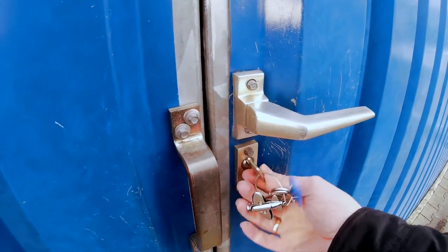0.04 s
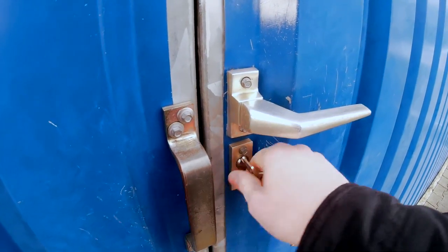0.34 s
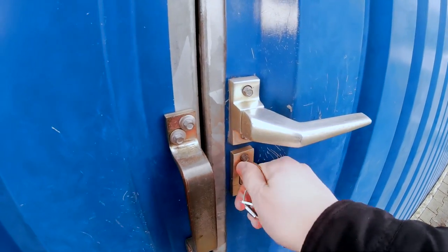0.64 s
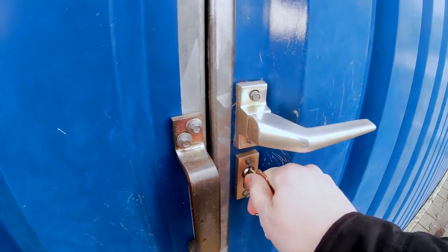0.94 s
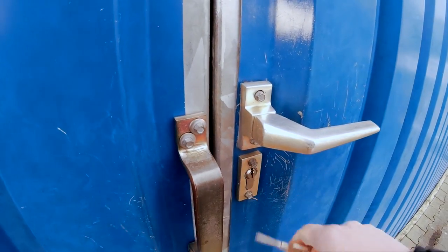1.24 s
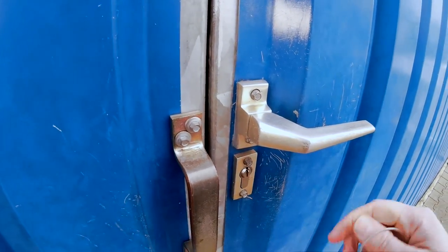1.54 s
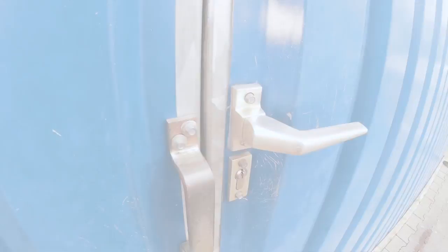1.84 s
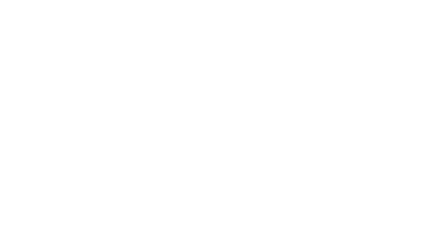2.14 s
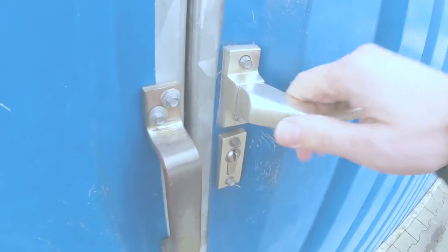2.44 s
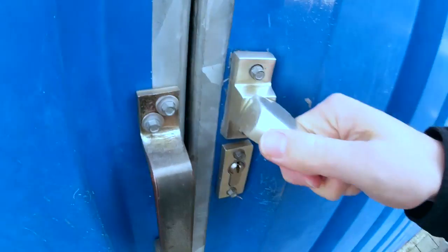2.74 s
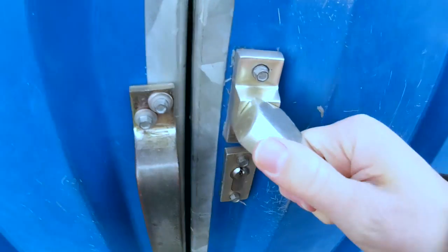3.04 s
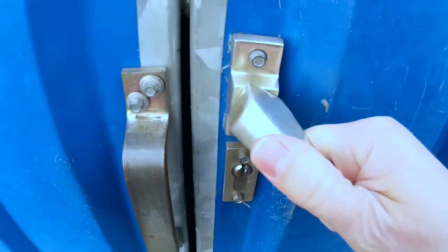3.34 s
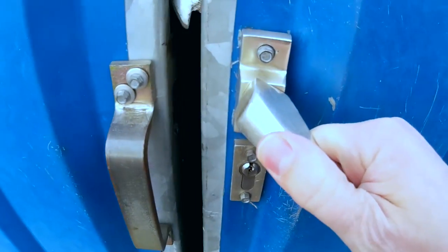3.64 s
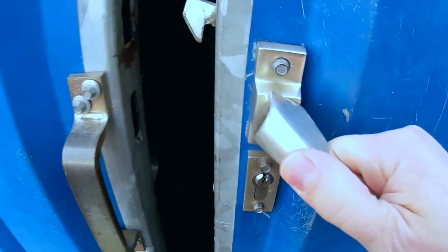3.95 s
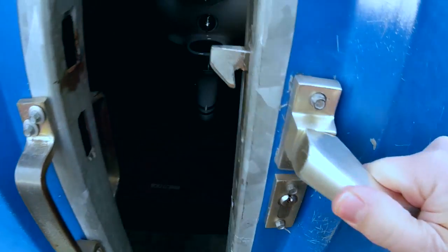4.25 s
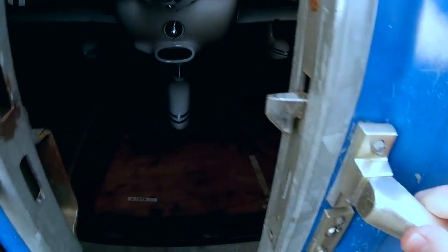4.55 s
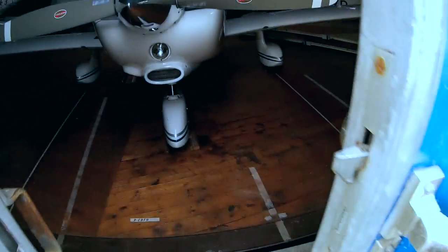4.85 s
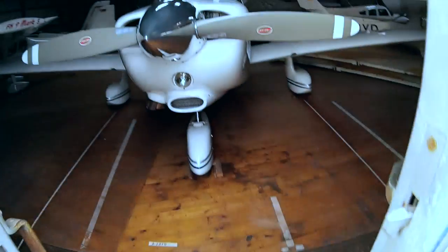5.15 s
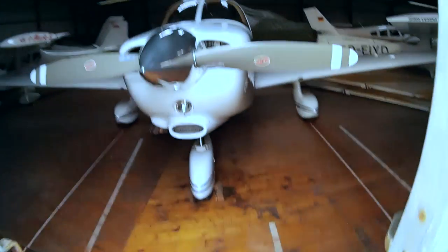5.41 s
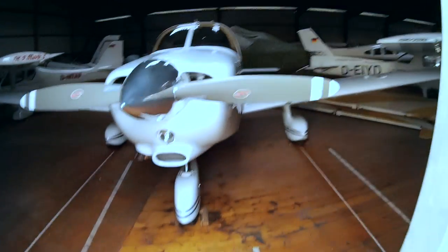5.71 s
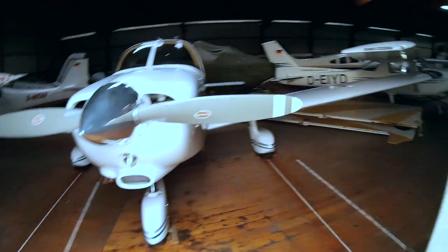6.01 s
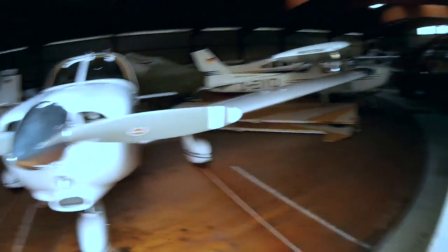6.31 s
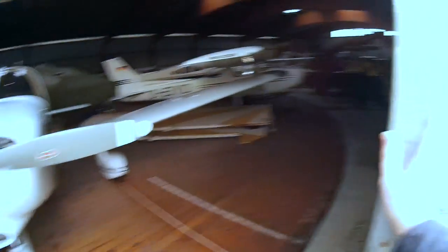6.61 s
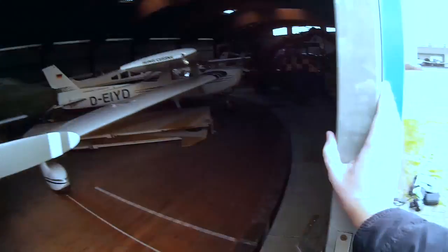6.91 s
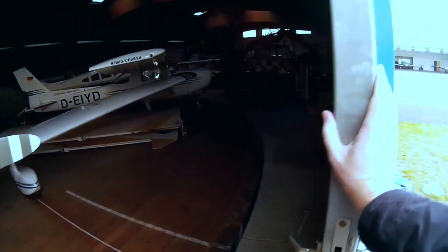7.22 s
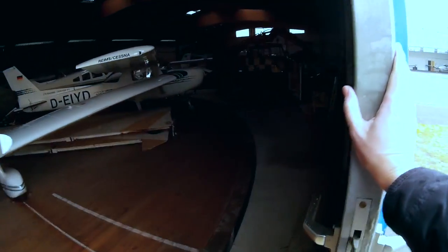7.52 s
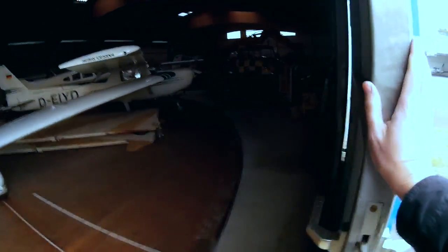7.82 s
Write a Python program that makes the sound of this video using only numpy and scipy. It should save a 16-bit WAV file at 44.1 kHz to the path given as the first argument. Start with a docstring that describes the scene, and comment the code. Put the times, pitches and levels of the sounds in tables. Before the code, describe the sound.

Keys jingle in a lock, a handle clacks, and a steel door squeals, then rumbles open on its rollers.

```python
"""Outdoors at a steel hangar door, in light wind, with a camera's faint pulsing whine. Keys collide and
ring in their modes as a cylinder lock is turned and the key drawn out. The handle goes down with three
clacks, impacts that set the steel leaf ringing. Stick-slip friction makes the door groan and squeal as
it breaks free; then its rollers rumble over the rail and its joints, slow, and are pushed on.
The hall behind the door adds a faint reverberation."""
import sys
import numpy as np
from scipy import signal
from scipy.fft import rfft, irfft, next_fast_len
from scipy.io import wavfile

SR = 44100
rng = np.random.default_rng(int(sys.argv[2]) if len(sys.argv) > 2 else 0)


def wav_record(signal):
    """Record a signal, one row per channel, as 16-bit PCM in the file named by sys.argv[1]."""
    frames = np.transpose(np.atleast_2d(signal))
    bounded = np.clip(frames, -1, 1)
    # unit amplitude maps onto the largest positive 16-bit level
    quanta = np.round(bounded * 32767).astype(np.int16)
    wavfile.write(sys.argv[1], SR, quanta)


N = 351477
TIME = np.arange(N) / SR
SCREECH_S = 3.586   # the squeal breaks into a higher mode

# speed of the door on its rail, as the level of its rollers: t/s, level/dB
ROLL = [(3.75, -52), (4.22, -39), (4.42, -40), (4.53, -23), (4.68, -30), (4.74, -28), (5.82, -31),
        (5.97, -41), (6.04, -36), (6.76, -49), (7.24, -46), (7.76, -26), (7.95, -23)]
# decay of the steel leaf: f/Hz, T60/s
DOOR_T60 = [(100, 0.51), (300, 0.12), (1000, 0.24), (3500, 0.29), (12000, 0.16)]


def from_db(db):
    """Amplitude ratio of a level."""
    return 10 ** (np.asarray(db) / 20)


def rms_one(x):
    """Normalisation to unit power."""
    return x / np.sqrt(np.mean(x ** 2) + 1e-20)


def at_hz(points, hz):
    """Interpolation on a logarithmic frequency axis."""
    frequencies, values = np.transpose(points)
    return np.interp(np.log(hz + 1e-9), np.log(frequencies), values)


def colour(x, spectrum):
    """Spectral shaping, falling 12 dB per octave beyond the ends of the spectrum; rms 1."""
    size = next_fast_len(len(x))
    hz = np.arange(size // 2 + 1) * SR / size + 1e-3
    ends = np.minimum(1, hz / spectrum[0][0]) ** 2 * np.minimum(1, spectrum[-1][0] / hz) ** 2
    return rms_one(irfft(rfft(x, size) * from_db(at_hz(spectrum, hz)) * ends, size)[:len(x)])


def drift(per_s):
    """Random modulation, interpolated between per_s values a second; rms 1."""
    return rms_one(np.interp(TIME * per_s, np.arange(N // 8), rng.standard_normal(N // 8)))


def grains(per_s, spread_db):
    """Shot noise: a Poisson train of tiny impacts of uneven size."""
    sizes = from_db(spread_db * np.minimum(rng.exponential(1, N), 4)) * rng.choice([-1, 1], N)
    return sizes * (rng.random(N) < per_s / SR)


def add(out, s, sound):
    """Superposition of a sound from time s on."""
    start = round(s * SR)
    out[start:start + len(sound)] += sound[:N - start]


def swells(rows):
    """Gaussian rises of amplitude that add in power, as incoherent sources do."""
    return np.sqrt(sum((from_db(db) * np.exp(-.5 * ((TIME - s) / half_s) ** 2)) ** 2
                       for s, half_s, db in rows))


def envelope(start_s, attack_s, hold_s, t60, db):
    """A smooth attack, a hold and an exponential decay."""
    rise = np.sin(np.pi / 2 * np.clip((TIME - start_s) / attack_s, 0, 1)) ** 2
    return rise * from_db(db - 60 * np.clip((TIME - start_s - attack_s - hold_s) / t60, 0, 2))


def glide(start_s, hz, hz_per_s):
    """A linear frequency sweep that stops after a quarter of a second."""
    return hz + hz_per_s * np.clip(TIME - start_s, 0, .25)


def tone(hz, partials, jitter_hz):
    """Sustained oscillation with frequency jitter; partials are harmonic number, level/dB."""
    phase = 2 * np.pi * np.cumsum(hz + jitter_hz * drift(700)) / SR
    return np.sqrt(2) * sum(from_db(db) * np.sin(k * phase) for k, db in partials)


def ring(modes, t):
    """Free vibration: damped sinusoids, weighted and tuned a little differently by each impact."""
    chance = rng.normal(0, (1.5, .001), (len(modes), 2))
    sines = sum(from_db(db + more_db - 60 * t / t60) * np.sin(2 * np.pi * hz * (1 + detune) * t)
                for (hz, db, t60), (more_db, detune) in zip(modes, chance))
    return sines * (1 - np.exp(-t / .0006))


def burst(spectrum, t60s, t, tilt_db=0, t60_factor=1):
    """High modal density: third octaves of noise, each decaying at its own rate; tilt per octave."""
    hz = np.arange(len(t) // 2 + 1) * SR / len(t)
    edges = np.geomspace(45, 16000, 26)
    centres = np.sqrt(edges[1:] * edges[:-1])[:, None]
    gain = from_db(at_hz(spectrum, hz) + tilt_db * np.log2(np.maximum(hz, 150) / 1000))
    noise = rfft(rng.standard_normal(len(t))) * gain
    bands = irfft(noise * ((hz >= edges[:-1, None]) & (hz < edges[1:, None])), len(t))
    envelopes = (1 - np.exp(-2 * centres * t)) * from_db(-60 * t / (at_hz(t60s, centres) * t60_factor))
    return (bands * envelopes).sum(0) / bands.sum(0).std()


def dip_db(s=2.29, half_s=.09, depth_db=6.5):
    """A brief Gaussian dip in the level of the background."""
    return -depth_db * np.exp(-.5 * ((TIME - s) / half_s) ** 2)


def travel():
    """Rolling noise grows with speed: the rollers' level/dB, and a 0-1 ramp as they start."""
    return np.interp(TIME, *np.transpose(ROLL)), np.clip((TIME - ROLL[0][0]) / .066, 0, 1)


def air(breeze_db=-50, wash_db=-51.3, fall_db_per_s=.6):
    """Turbulent pressure fluctuations on the microphone, over a wash of distant outdoor noise."""
    # gusts, and the draught through the opening door: centre t/s, half width/s, level/dB
    gusts = [(0.0, .035, -38), (0.5, .3, -44), (1.2, .1, -38), (2.85, .3, -49), (3.65, .3, -44),
             (4.42, .3, -32), (5.3, .6, -38.5), (7.8, .35, -45)]
    # spectra of the wind and the wash: f/Hz, level/dB
    wind_spectrum = [(20, 3), (40, -7), (58, 2.5), (80, -7.5), (150, -10.5), (300, -25.5), (500, -36.5)]
    wash_spectrum = [(200, 1), (430, -3.5), (650, -3), (1000, -0.5), (1300, -4.5), (1600, -7.5),
                     (2200, -18.5), (4300, -22.5), (8500, -29.5)]
    strength = np.hypot(from_db(breeze_db), swells(gusts)) * from_db(.92 * drift(14))
    wind = strength * colour(rng.standard_normal(N), wind_spectrum)
    wash_level = from_db(wash_db - fall_db_per_s * TIME + 2.1 * drift(15))
    wash = wash_level * colour(rng.standard_normal(N), wash_spectrum)
    return (wind + wash) * from_db(dip_db())


def camera_noise(whine_hz=9514, bend_hz=660, pulse_hz=36.316):
    """Electrical noise: hiss, and an amplitude-modulated whine that grows with the rumble."""
    # spectrum of the hiss: f/Hz, level/dB
    hiss_spectrum = [(2000, 2), (5000, -1), (11000, 1.5), (14500, -6.5)]
    roll_db, _ = travel()
    hz = whine_hz + bend_hz * np.exp((TIME - TIME[-1]) / .09)   # bends upward at the end
    db = -58.3 + .9 * np.clip(roll_db + 39, 0, 9) + 2.2 * dip_db()
    gate = np.clip(.5 + 1.1 * np.cos(2 * np.pi * pulse_hz * (TIME - .0085)), 0, 1)
    whine = from_db(db) * gate * tone(hz, [(1, 0)], jitter_hz=11.5)
    return whine + from_db(-63 + .4 * dip_db()) * colour(rng.standard_normal(N), hiss_spectrum)


def keys():
    """Each collision chatters and excites the modes of the bunch, weighted by the part struck."""
    # collisions: t/s, relative level/dB, part struck
    jingles = [(0.0024, -38, "long key"), (0.179, -28, "gripped key"), (0.197, -23.5, "gripped key"),
               (0.27, -40, "small key"), (0.285, -27, "small key"), (0.4288, -39, "ring"),
               (0.4486, -23.5, "small key"), (0.4595, -22, "small key"), (0.4725, -16, "small key"),
               (0.5967, -32.5, "small key"), (0.7216, -28, "small key"), (1.4425, -22, "gripped key"),
               (1.453, -22, "gripped key"), (1.5955, -20, "gripped key"), (1.6215, -23, "gripped key"),
               (1.6447, -30, "small key"), (1.663, -20.5, "long key"), (1.6705, -24, "small key"),
               (1.731, -25, "ring"), (1.7479, -22.5, "ring"), (1.774, -26.5, "small key"),
               (1.7916, -30, "small key"), (1.884, -35, "ring"), (1.9065, -43, "ring"),
               (1.937, -41, "ring"), (1.965, -42, "ring"), (2.008, -41, "small key"),
               (2.152, -36, "gripped key")]
    # modes of the small keys, whole bunch, split ring and long key: f/Hz, level/dB, T60/s
    small_modes = [(11520, -2, 0.064), (11760, -9, 0.046), (10980, -19, 0.038)]
    bunch_modes = [(5520, -33, 0.066), (10050, -23, 0.12), (14450, -26, 0.028)]
    ring_modes = [(4275, 3, 0.076), (4380, -1, 0.053), (4970, -8, .06), (5470, -10.5, .07)]
    long_modes = [(7060, 0.48, 0.081), (9700, -0.74, 0.15)]
    # by part struck: split ring gain/dB, long key gain/dB, T60 factor of the other modes
    response = {"small key": (-26, -35, 1), "gripped key": (-40, -35, .45), "ring": (-3.5, -33, 1),
                "long key": (-17, -13, 1)}
    # spectrum of the chatter: f/Hz, level/dB
    chatter_spectrum = [(2300, 0), (4000, -5.5), (5300, 3.5), (6300, -6), (8500, -1), (12000, -6.5)]
    out, t = np.zeros(N), TIME[:2 ** 13]
    for s, db, part in jingles:
        ring_db, long_db, t60_factor = response[part]
        metal = ring([(hz, level, t60 * t60_factor) for hz, level, t60 in small_modes + bunch_modes], t)
        metal += from_db(ring_db - 7) * ring(ring_modes, t)
        metal += from_db(long_db - 2) * ring(long_modes, t)
        contacts = rng.standard_normal(len(t)) * from_db(5.3 * np.repeat(rng.standard_normal(128), 64))
        chatter = colour(contacts, chatter_spectrum) * from_db(-60 * t / .14)
        # a harder knock lengthens the contact, so the chatter grows less than the ring
        chatter_gain = from_db(-50 + .25 * (db + 23.5)) * np.sqrt(t60_factor)
        add(out, s, from_db(db + 1.5) * metal + chatter_gain * chatter)
    return out


def leaf_drumming(cruise_db=-32.3, follows=.65):
    """Low plate modes of the leaf boom under pushes and thuds, and drum as the rollers shake it."""
    # hand pressure, the bolt's thud, the rollers' first jolt: centre t/s, half width/s, level/dB
    booms = [(0.1, .2, -52), (0.93, .03, -50), (2.6, .07, -51), (2.86, .07, -40), (3.02, .1, -49),
             (3.68, .13, -47), (4.2, .12, -37), (4.545, .035, -24.5)]
    # response of the leaf: f/Hz, level/dB
    spectrum = [(60, -17), (92, -12), (115, 1), (135, 2), (155, -3.5), (190, 0.5), (230, -0.5),
                (290, -13.5), (500, -19)]
    roll_db, moving = travel()
    shaking = moving * from_db(cruise_db + follows * (roll_db + 30))
    drive = np.hypot(shaking, swells(booms)) * from_db(.5 * drift(25))
    return drive * colour(grains(1100, 1.16), spectrum)


def lock_and_grip():
    """Heavily damped metal parts tick, the lock case knocks, and sliding friction scrapes."""
    # clicks of the key, the bunch, then the hand gripping the handle: t/s, relative level/dB
    clicks = [(0.078, -41), (0.125, -38), (0.72, -37), (0.934, -35), (1.063, -35.5), (1.103, -33),
              (1.132, -33.5), (1.152, -42), (1.759, -33), (1.787, -30), (1.828, -41), (1.936, -39),
              (1.974, -41), (2.108, -43), (2.153, -42), (2.52, -45)]
    # scrapes of the key, the bunch, then the hand on the handle: centre t/s, half width/s, level/dB
    scrapes = [(0.47, .03, -54), (0.62, .025, -53), (0.87, .01, -47.5), (0.945, .018, -46),
               (1.065, .005, -42), (1.135, .035, -46), (2.08, .025, -55), (2.235, .012, -51),
               (2.55, .05, -54)]
    # spectra of a click and a scrape: f/Hz, level/dB
    click_spectrum = [(300, -25.5), (950, 0), (1700, -5), (2700, -11), (4400, -6), (6500, -11),
                      (9000, -8.5), (11300, 11), (14500, -15)]
    scrape_spectrum = [(400, -14), (700, -4), (1000, 0), (1700, -5), (2700, -20), (4400, -19), (7000, -29),
                       (12000, -28)]
    t60s = [(800, .23), (4500, .1), (9000, .039)]   # f/Hz, T60/s
    out, t = np.zeros(N), TIME[:2 ** 13]
    tick = 1 + from_db(6) * np.exp(-t / .0025)
    for s, db in clicks:
        add(out, s, from_db(db - 10) * tick * burst(click_spectrum, t60s, t, tilt_db=-2.4))
    return out + swells(scrapes) * colour(grains(2500, 2.5), scrape_spectrum)


def clinks(per_s=110, t60=.016):
    """Faint random collisions among the keys merge into shot noise while the hand moves."""
    # movements of the hand: centre t/s, half width/s, level/dB
    handling = [(0.28, .055, -51), (0.44, .05, -51), (1.13, .035, -56), (1.78, .04, -47), (1.95, .11, -58)]
    # spectrum of the clinks: f/Hz, level/dB
    spectrum = [(2300, -9), (3500, -8), (4400, 0), (5400, 0), (6500, -9), (9500, -7), (11500, 10),
                (12800, -6), (14500, -2)]
    t = TIME[:2 ** 13]
    clink = rng.standard_normal(len(t)) * from_db(-60 * t / t60)
    return swells(handling) * colour(signal.fftconvolve(grains(per_s, 3.5), clink)[:N], spectrum)


def blow(s, db, tilt_db, t60_factor, part_hz):
    """Impact on the door: a crack coloured by the struck part's resonance, then free vibration."""
    # spectrum of the impact: f/Hz, level/dB
    impact_spectrum = [(60, -28.5), (170, 0.5), (290, 2.5), (460, 0), (950, 1), (1650, -3), (2000, -13),
                       (2500, -12), (4100, -13), (5200, -17.5), (8000, -18), (14000, -26.5)]
    # modes of the steel leaf and its latch: f/Hz, level/dB, T60/s
    door_modes = [(171.4, -18.5, 0.87), (441, -13.5, 0.16), (867, -17, 0.14), (1580, -26, 0.14),
                  (2460, -20.5, 0.22), (3400, -17, .22)]
    out, t = np.zeros(N), TIME[:2 ** 15]
    grid_hz = np.geomspace(45, 16000, 150)
    resonance_db = 9.1 / (1 + (np.log2(grid_hz / part_hz) / .21) ** 2)
    spectrum = np.column_stack([grid_hz, at_hz(impact_spectrum, grid_hz) + resonance_db])
    onset = 1 + from_db(.5) * np.exp(-t / .0035)
    crack = onset * burst(spectrum, DOOR_T60, t, tilt_db, t60_factor)
    modes = [(hz, level + tilt_db * np.log2(hz / 1000) / 2, t60 * t60_factor)
             for hz, level, t60 in door_modes]
    add(out, s, from_db(db - 4.5) * (crack + from_db(.5) * ring(modes, t)))
    return out


def clacks(rebound_s=.017):
    """Inelastic impacts of handle and latch: each rebounds softer, duller, lower, and rings longer."""
    # strikes: t/s, relative level/dB, tilt/(dB per octave), T60 factor, resonance f/Hz
    strikes = [(2.74, -34, -7, .7, 1090), (2.7619, -25, .5, 1.1, 1030), (2.8671, -21.5, 2.3, 0.62, 4040),
               (3.096, -27.5, -.5, 0.42, 460), (3.109, -24.5, -.5, 0.36, 1700)]
    return sum(blow(s, db, tilt_db, t60_factor, hz)
               + blow(s + rebound_s, db - 7, tilt_db - 4.5, 2 * t60_factor, .55 * hz)
               for s, db, tilt_db, t60_factor, hz in strikes)


def latch_hook(start_s=3.099):
    """Rough stick-slip of steel on steel: the hook squawks off its catch."""
    level = envelope(start_s, .012, .009, t60=.04, db=-32.5) * from_db(3 * drift(400))
    return level * tone(glide(start_s, 1550, hz_per_s=10000), [(1, -2), (2, -13.5)], jitter_hz=130)


def rub():
    """Dry friction: colliding asperities make broadband noise as the door breaks free."""
    # f/Hz, level/dB
    spectrum = [(200, 8.5), (520, 3), (1100, 4.5), (2000, -11.5), (3400, -15.5), (6000, -20),
                (12000, -21)]
    return envelope(3.27, .26, .17, t60=.28, db=-41) * colour(grains(3000, 1.7), spectrum)


def groan(start_s=3.3, top_hz=866):
    """Slow stick-slip, a relaxation oscillation: rising harmonics over a rough, lower growl."""
    # harmonic number, level/dB
    partials = [(1, -2), (2, -19), (3, -18.5), (4, -13), (5, -12), (7, -29)]
    hz = np.minimum(glide(start_s, 782, hz_per_s=680), top_hz)
    growl = envelope(3.305, .035, .012, t60=.45, db=-43.5) * tone(.63 * hz, [(1, .024)], jitter_hz=59)
    harmonics = envelope(start_s, .1, .025, t60=.17, db=-40.5) * tone(hz, partials, jitter_hz=16)
    surge = envelope(3.395, .025, .008, t60=.15, db=-36) * tone(hz, [(1, 0)], jitter_hz=11)
    return growl + harmonics + surge


def squeal(mode_hz=3815.5, flat_hz=400, lock_on_s=3.416, swell_db_per_s=32):
    """Self-excited vibration: friction starts flat and rasping, then locks on to a mode of the steel."""
    # harmonic number, level/dB
    harmonics = [(1, -1.5), (2, -16.5), (3, -34)]
    # the rasp just below the mode: f/Hz, level/dB
    rasp_spectrum = [(2900, -25), (3350, -5), (3600, 0), (3800, -6), (4100, -28), (6800, -34), (7200, -20),
                     (7600, -32)]
    loose = .5 - .5 * np.tanh((TIME - lock_on_s) / .022)
    released = np.clip((TIME - SCREECH_S) / .04, 0, 1)   # the grip breaks and the overtones weaken
    roughness = .02 + .9 * loose + .09 * released
    partials = [(k, db - 12 * released * (k > 1)) for k, db in harmonics]
    pull = from_db(swell_db_per_s * (np.minimum(TIME, SCREECH_S) - 3.53))
    first_catch = pull * envelope(3.385, .125, .08, t60=.27, db=-16)
    second_catch = envelope(3.68, .03, .035, t60=.18, db=-44)
    flutter = from_db(9 * roughness * drift(300))
    vibration = tone(mode_hz - flat_hz * loose, partials, jitter_hz=170 * roughness)
    rasp = envelope(3.398, .025, .045, t60=.22, db=-39) * colour(grains(4000, 2), rasp_spectrum)
    return (first_catch + second_catch) * flutter * vibration + rasp


def screech():
    """Mode jump: friction drives a higher, harsher mode, which sags in pitch inside a noisy fringe."""
    # f/Hz, level/dB
    spectrum = [(3300, -29), (4100, -3), (4300, 17.5), (4500, -28.5), (4700, -5.5), (5100, -52),
                (7500, -33), (8100, -16), (8800, -25.5)]
    fringe = from_db(4) * colour(rng.standard_normal(N), spectrum)
    vibration = tone(glide(SCREECH_S, 4250, hz_per_s=-800), [(1, 3.5), (2, -30)], jitter_hz=72.4)
    return envelope(SCREECH_S, .012, .008, t60=.26, db=-30.5) * (vibration + fringe)


def steel(x):
    """Convolution adds the many narrow resonances of sheet steel to the direct sound; rms 1."""
    tail = burst([(100, 0), (10000, 0)], DOOR_T60, TIME[:2 ** 14])
    return rms_one(x + from_db(-11.5) * signal.fftconvolve(x, tail / np.linalg.norm(tail))[:N])


def rolling(hand_on_s=6.636, hand_damps_db=1):
    """Rolling contact is a stream of tiny impacts; grit and loose fittings rattle more with speed."""
    # spectra of the rollers, the grit and the fittings: f/Hz, level/dB
    roller_spectrum = [(150, -10), (280, -2.5), (400, 2), (600, -1), (900, -4), (1250, -8.5), (1450, -13),
                       (1700, -11.5), (2050, -24.5), (2450, -31.5), (2850, -39), (4000, -31)]
    grit_spectrum = [(1500, 8), (2500, 8), (2900, 6), (3450, -18), (4000, 2.5), (5000, -3.5), (6500, -11),
                     (11500, -6.5), (14500, -33)]
    rattle_spectrum = [(2000, -10), (2450, 1.5), (2850, -14), (3450, -3.5), (3900, -12.5), (5000, -27)]
    roll_db, moving = travel()
    rollers = from_db(roll_db - .2 + 1.1 * drift(40)) * colour(steel(grains(2600, 2.1)), roller_spectrum)
    grit = from_db(-21.7) * colour(grains(5000, 3.9), grit_spectrum)
    rattle_level = from_db(-25.5 + 3.7 * np.minimum(drift(90), 2))
    rattle = rattle_level * colour(steel(grains(2500, 3.1)), rattle_spectrum)
    t = TIME[:2 ** 11]
    tick = rng.standard_normal(len(t)) * from_db(-60 * t / .04)
    ticks = from_db(-24) * colour(signal.fftconvolve(grains(45, 1.5), tick)[:N], rattle_spectrum)
    held = TIME > hand_on_s   # a hand holds the leaf and quiets the fittings
    shaking = from_db(roll_db + .27 * (roll_db + 35) - hand_damps_db * held)
    return moving * (rollers + shaking * (grit + rattle + ticks * ~held))


def rail_joints():
    """Impact excitation as the rollers cross joints; the heavier the jolt, the duller it is."""
    # jolts: t/s, relative level/dB, resonance of the shaken part f/Hz
    jolts = [(4.488, -23, 520), (4.510, -17.5, 495), (4.531, -21, 400), (4.564, -22, 480),
             (4.724, -24.5, 1220), (4.772, -23, 1110), (4.848, -26, 716), (5.265, -29.5, 2450),
             (5.640, -29, 3150), (6.075, -33, 800)]
    return sum(blow(s, db, tilt_db=-6 - .4 * (db + 25), t60_factor=1.4, part_hz=hz)
               for s, db, hz in jolts)


def dead_knock():
    """Damping by the hand cuts short one impact on the held door."""
    return blow(6.636, db=-31, tilt_db=-4, t60_factor=.15, part_hz=1250)


def hangar(x):
    """Reverberation: convolution with the long, diffuse decay of the hall behind the door."""
    # reverberation time: f/Hz, T60/s
    t60s = [(100, 2.5), (1000, 0.88), (4000, 2.1), (12000, 1.5)]
    tail = burst([(100, 9), (4000, 5.5), (12000, -10)], t60s, TIME[:2 ** 16])
    return signal.fftconvolve(x, tail / np.linalg.norm(tail))[:N]


def scene():
    """Keys and lock radiate into the free field; the door also excites the hall."""
    outdoors = air() + keys() + lock_and_grip() + clinks()
    door = leaf_drumming() + clacks() + latch_hook() + rub() + groan() + squeal() + screech()
    door += rolling() + rail_joints() + dead_knock()
    return (outdoors + door + from_db(-37) * hangar(door))[None]


def record(dry):
    """The camera adds its self-noise and limits the bandwidth with a steep low-pass filter."""
    stopband_hz = 15200
    lowpass = signal.cheby2(18, 60, stopband_hz, fs=SR, output="sos")
    return signal.sosfilt(lowpass, dry + camera_noise())


dry = scene()
out = record(dry)
wav_record(out)
```